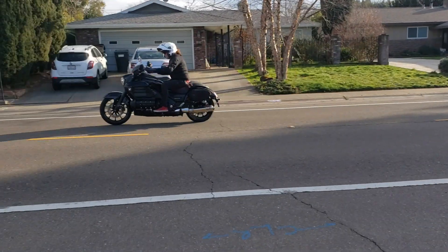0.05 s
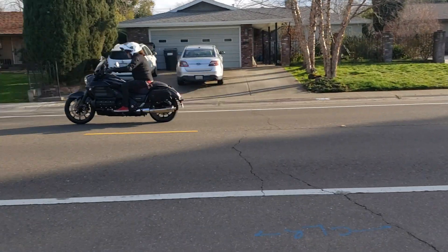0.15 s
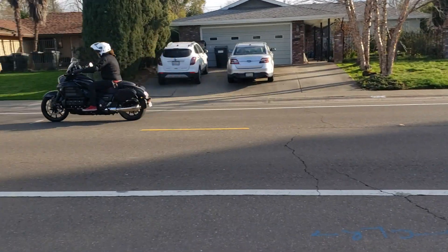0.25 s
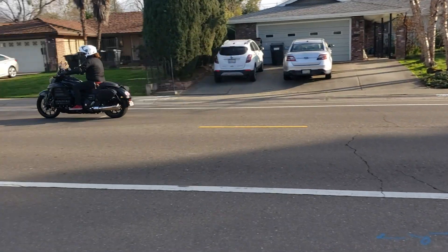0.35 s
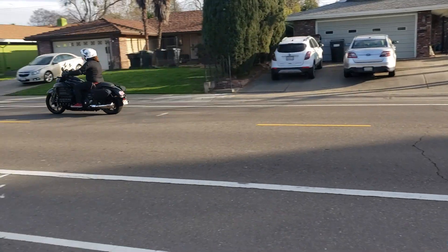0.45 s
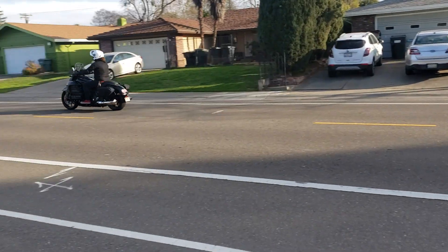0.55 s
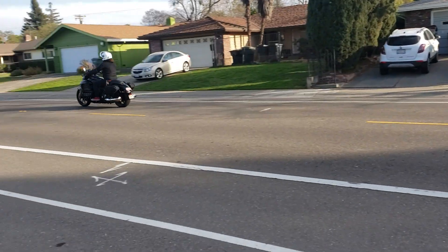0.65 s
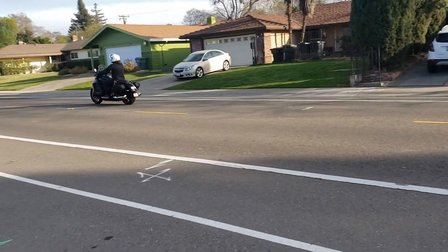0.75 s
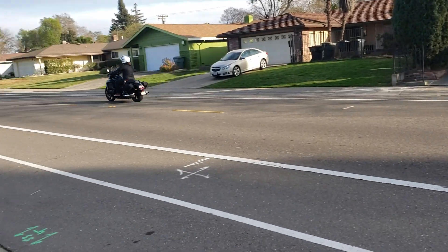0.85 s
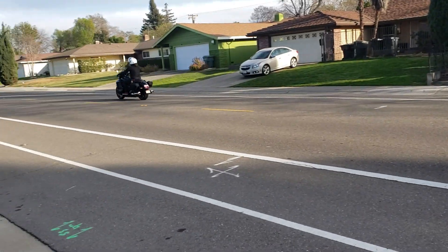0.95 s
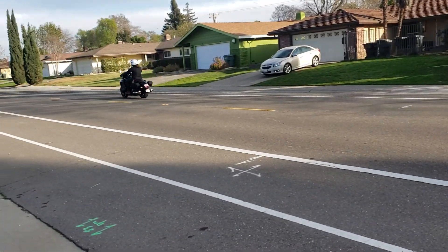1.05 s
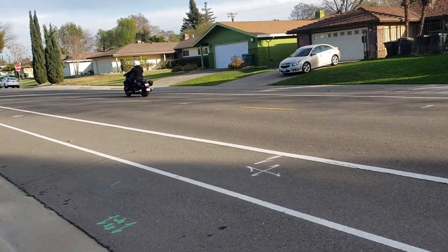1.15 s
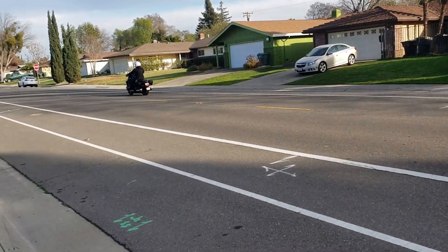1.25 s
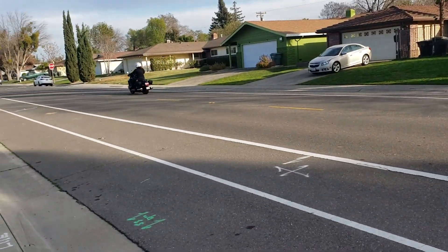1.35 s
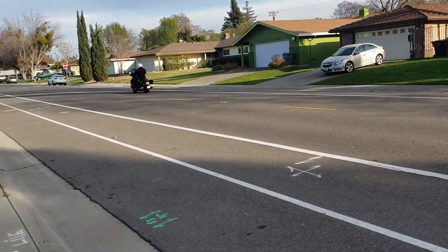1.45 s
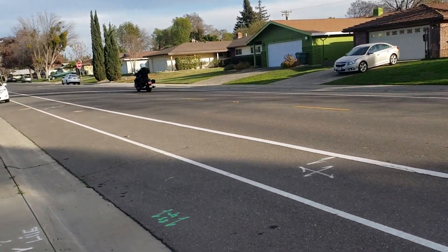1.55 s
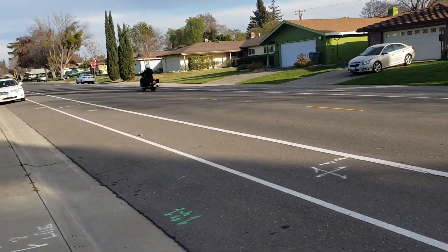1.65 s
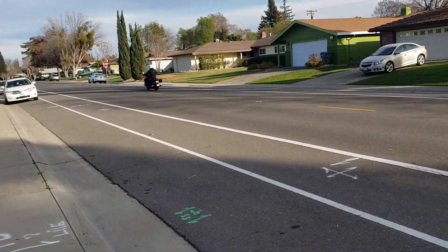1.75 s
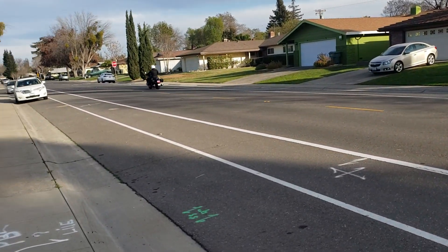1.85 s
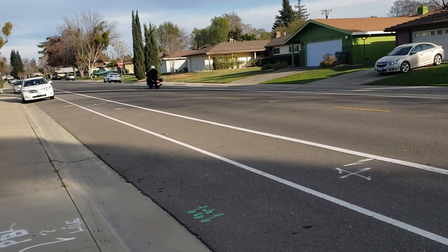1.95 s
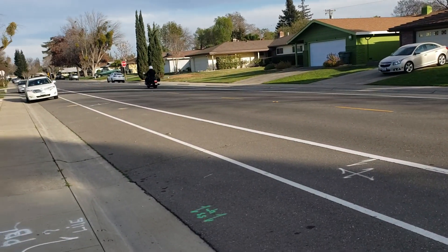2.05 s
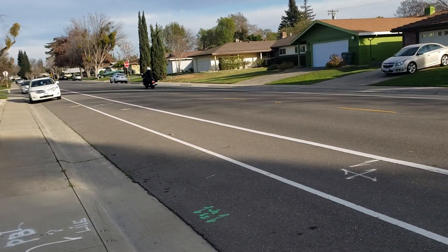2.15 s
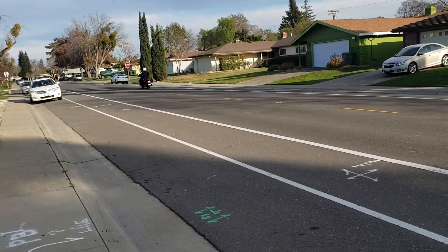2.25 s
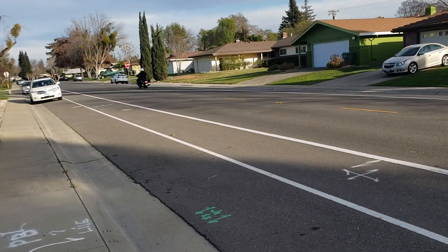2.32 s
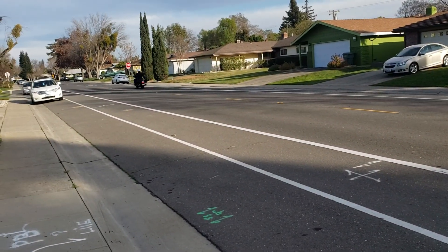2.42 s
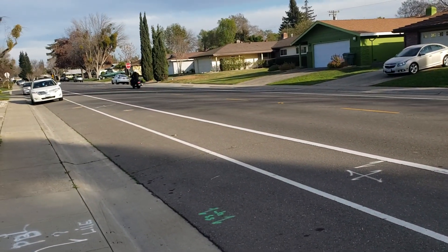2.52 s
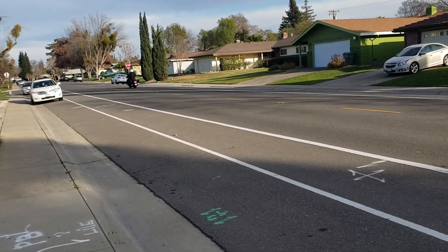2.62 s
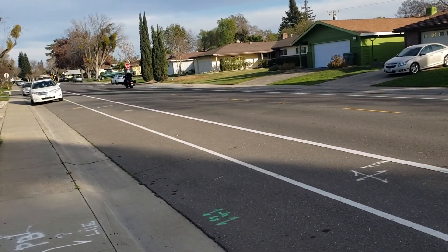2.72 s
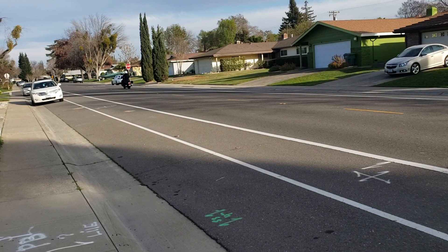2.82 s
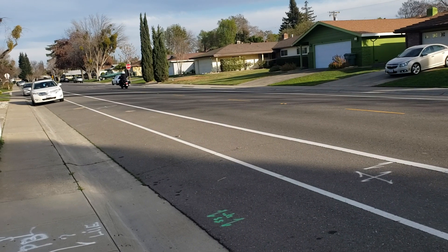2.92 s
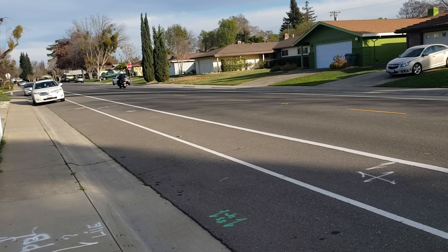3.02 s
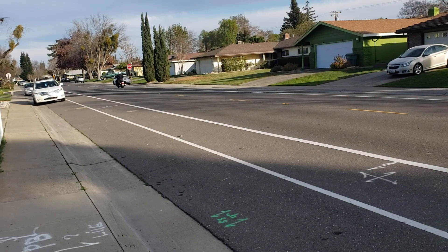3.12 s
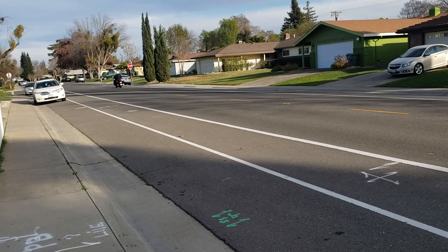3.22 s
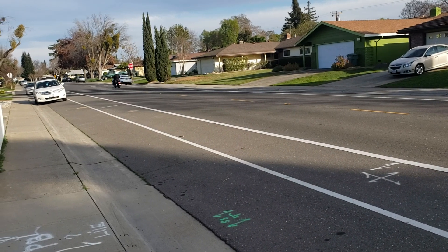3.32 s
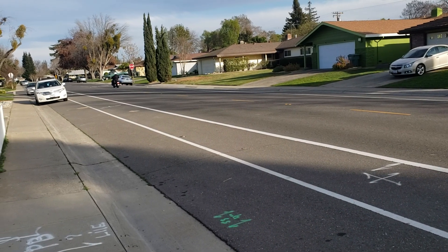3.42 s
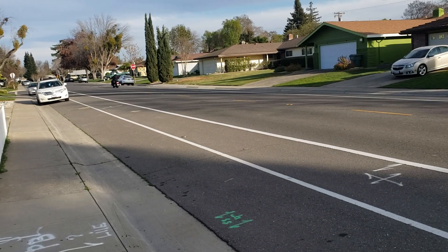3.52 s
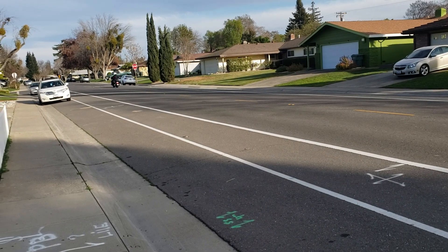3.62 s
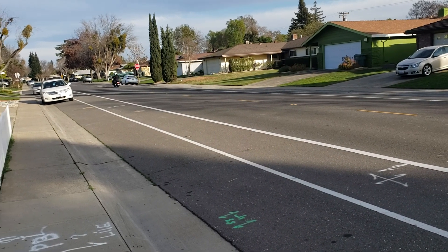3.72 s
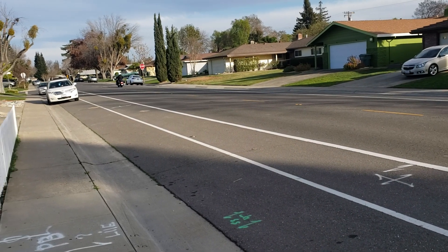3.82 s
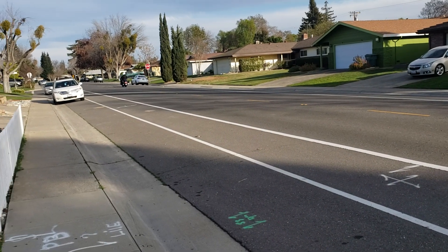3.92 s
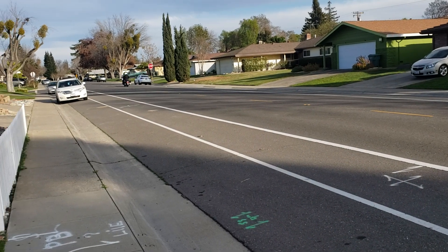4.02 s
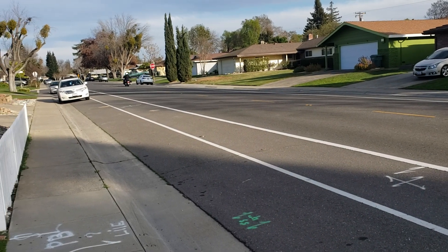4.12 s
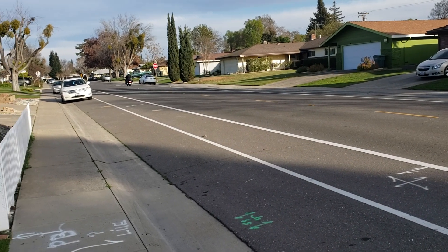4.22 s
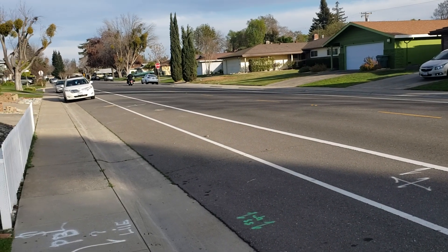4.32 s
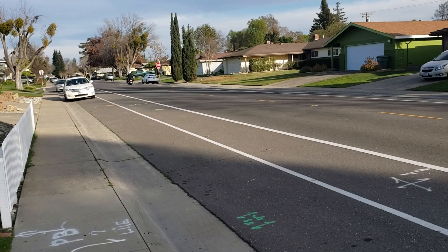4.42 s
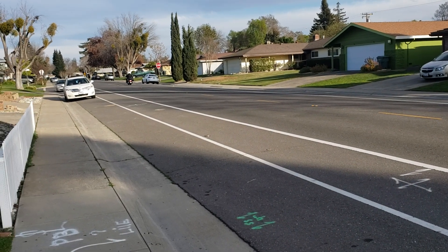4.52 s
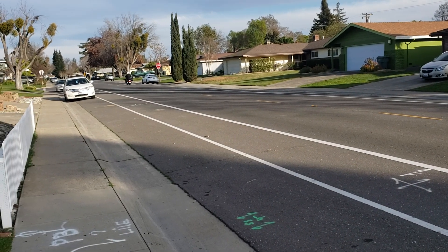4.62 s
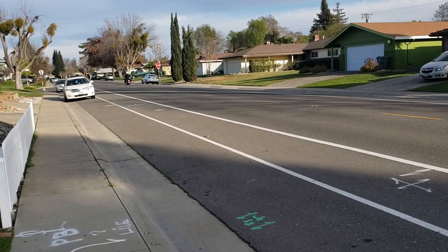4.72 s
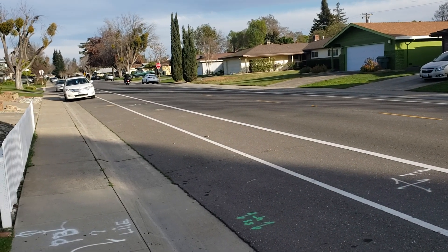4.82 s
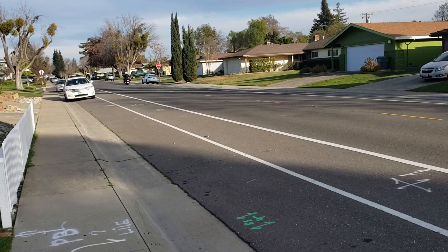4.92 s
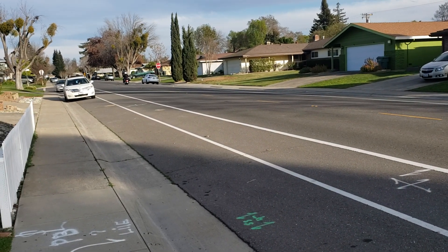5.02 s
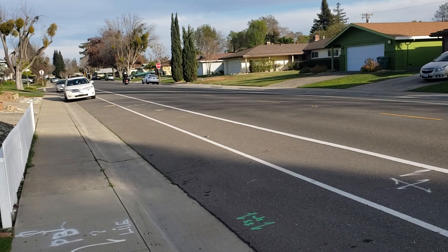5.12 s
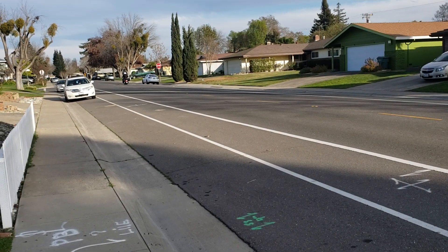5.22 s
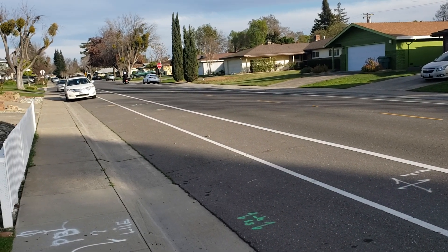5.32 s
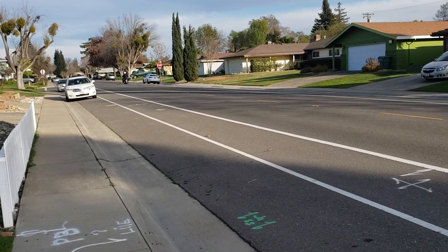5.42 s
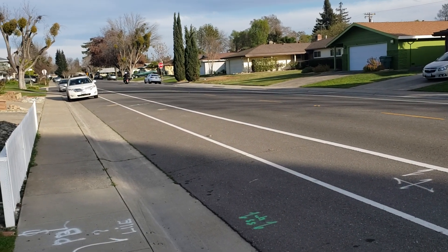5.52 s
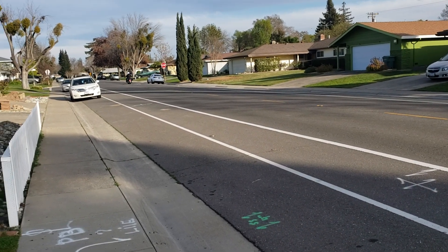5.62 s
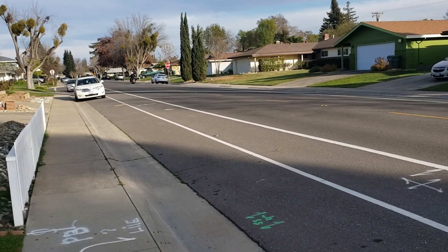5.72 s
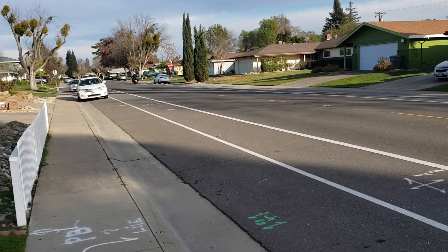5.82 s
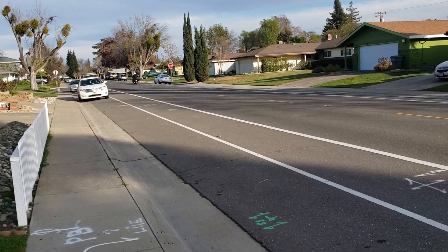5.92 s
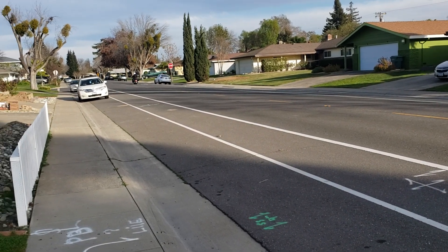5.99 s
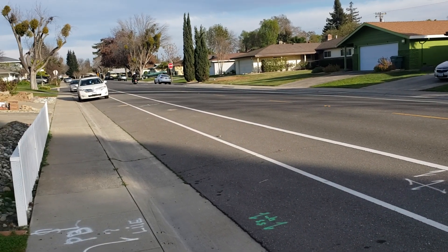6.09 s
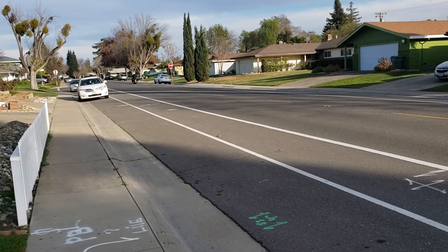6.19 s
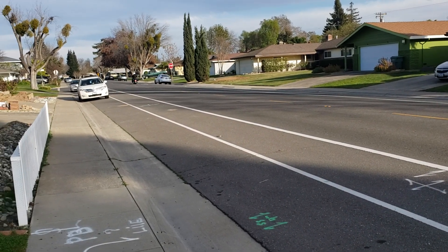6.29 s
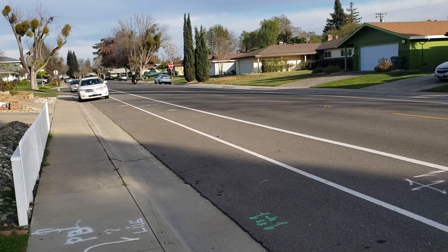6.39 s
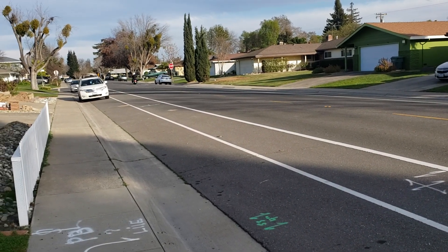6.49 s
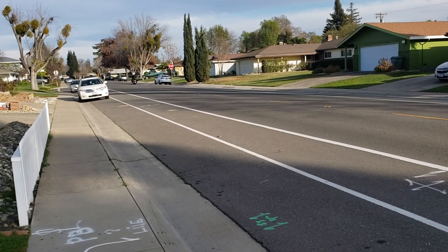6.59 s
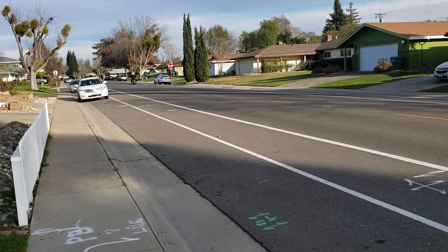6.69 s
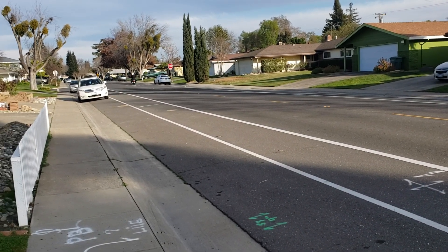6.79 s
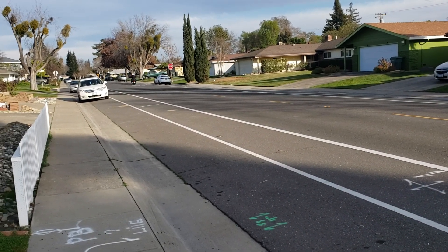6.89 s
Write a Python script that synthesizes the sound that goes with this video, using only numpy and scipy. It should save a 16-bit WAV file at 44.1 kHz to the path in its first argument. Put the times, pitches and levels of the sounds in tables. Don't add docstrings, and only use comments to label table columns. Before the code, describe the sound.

A roadside stereo microphone on an open suburban street. At 0 s a large motorcycle is right there: a deep, full exhaust drone with rough engine roar and tyre hiss, and a short metallic chirp at about 0.1 s. Pitch peaks near 0.2 s, then slides steadily down as the machine rides away; hiss and thin gear whine fade over the first few seconds, and the tone flutters with brief dips. Dry grit ticks close by at 1.7 s, 2.1 s with a dull knock, 2.4 s and most strongly around 2.9 s. Faint bird chirps begin at 3.2 s and recur. From 4.1 to 5.5 s the distant engine nears idle with soft, low, irregular pops, weakening. Two small low throttle swells follow near 5.8 and 6.8 s, over distant traffic rumble and a faint steady motor hum.

```python
import sys
import numpy as np
from scipy import signal
from scipy.io import wavfile

SR = 44100
rng = np.random.default_rng(int(sys.argv[2]) if len(sys.argv) > 2 else 0)


def decibels_to_gain(level_db):
    exponent = np.asarray(level_db, float) / 20
    return 10 ** exponent


def file_out(sig):
    cols = np.atleast_2d(sig).T
    lim = np.clip(cols, -1, 1)
    pcm = np.round(lim * 32767).astype(np.int16)
    wavfile.write(sys.argv[1], SR, pcm)


N = 306495

# frequency in Hz, level in dB per Hz.
STREET_SPECTRUM = [(25, -17), (59, 0), (89, 1.5), (123, -4.5), (210, -20), (380, -23.5), (652, -25.5),
                   (1000, -27.5), (1900, -44), (2450, -67.5), (4000, -67), (8300, -78.5), (11500, -57),
                   (15800, -53)]
# time in seconds, level in dB.
STREET_LEVEL = [(0, -41.5), (4.5, -41.5), (5.3, -42.5), (6, -39), (6.95, -38.5)]
# frequency in Hz, likeness, limited to -1 to 1 when used.
STREET_LIKENESS = [(60, 1), (250, .9), (400, 0.56), (600, .5), (1000, -0.49), (2000, -0.55), (4000, -2.1),
                   (15000, 0.2)]
# frequency in Hz, left against right in dB.
PORT_BALANCE = [(60, -1.5), (110, 1), (200, -0.5), (380, -0.5), (1290, 3.5), (2380, 1.5), (5400, 3.5),
                (9800, -7.5), (13500, 3)]

# time in seconds, pitch in Hz, level in dB.
FAR_MOTOR = [(4.15, 259.7, -87), (4.24, 258.1, -60.5), (5.32, 261.7, -60.5), (5.95, 256.6, -49.5),
             (6.56, 257, -52.5), (6.95, 257.6, -53.5)]
# multiple of the pitch, level in dB.
FAR_MOTOR_ORDERS = [(.667, -2.5), (0.752, -18), (1, -0.5)]

# start in seconds, level in dB, extra level of the lead note in dB.
BIRD_PHRASES = [
    (3.245, -72, -20),
    (4.7, -76, -3),
    (5.995, -75, 2),
    (6.63, -77, -20),
]
# delay in seconds, length in seconds, start in Hz, end in Hz, level in dB.
PHRASE_NOTES = [
    (0, .04, 5140, 5080, 1),
    (.022, .07, 4850, 3600, -7),
    (.07, .08, 3750, 3380, 0.0),
]
# start in seconds, length in seconds, start in Hz, end in Hz, level in dB.
SINGLE_NOTES = [
    (3.32, .16, 3900, 3400, -77),
    (3.36, .12, 3400, 3350, -75),
    (3.77, .07, 2800, 2780, -72),
    (5.37, .08, 3400, 3350, -78),
    (6.85, .05, 3300, 3250, -82),
]

# start in seconds, then body, edge and treble peaks in dB, left against right in dB.
GRIT = [(1.6873, -42, -66, -76, 0), (1.6958, -46, -49.5, -65.5, -5.5), (2.0947, -39.5, -54, -65, 6.5),
        (2.1002, -44, -47.5, -54, -1.5), (2.1105, -33.5, -52, -60, 5), (2.1566, -46, -72, -64, -8),
        (2.1658, -44.5, -60, -67, 10), (2.3898, -40, -61, -84, -5.5), (2.798, -56, -70, -84, -2),
        (2.8673, -58, -67, -70.5, 7), (2.8797, -47, -56, -72, -4), (2.8889, -44, -48, -64, 7),
        (2.896, -39, -49, -56, 6.5), (2.9092, -29.5, -39, -55, 6.5), (2.9185, -44, -45, -63, -3),
        (2.9265, -41.5, -46, -52, -5.5), (2.9432, -44, -62, -69.5, 6), (2.9667, -49, -67.5, -81, 4),
        (3.8086, -64, -90, -91, 9)]
# start in seconds, pitch in Hz, 60 dB decay time in seconds, level in dB.
KNOCK = [
    (2.127, 640, .06, -37),
]

# frequency in Hz, level in dB, 60 dB decay time in seconds.
SQUEAK_MODES = [(1470, -14, 0.077), (1617, -0.5, 0.12), (1683, -0.5, 0.07), (1830, -7.5, 0.077),
                (1700, 1, 0.023), (3210, -23.5, 0.15), (3270, -16.5, 0.095)]
# start in seconds, level in dB.
SQUEAK_HITS = [(0.076, -28), (0.078, -26), (0.083, -23), (0.092, -25), (0.1, -37), (0.128, -43),
               (0.144, -45), (.152, -37), (0.166, -48), (0.187, -47), (0.202, -44), (0.221, -45),
               (0.239, -44), (0.252, -57)]

# frequency in Hz, likeness from -1 to 1.
MACHINE_LIKENESS = [(60, 0.98), (250, 0.65), (550, 0.39), (800, 0.39), (1500, 0.81), (2200, 0.037),
                    (4000, 1), (6000, 0.12), (15000, 0.18)]
# frequency in Hz, level in dB per Hz.
HISS_SPECTRUM = [(1290, -27), (2200, 5), (2470, -2), (3080, -2.5), (3660, -2), (4010, -2.5), (4800, -6.5),
                 (6250, -4), (8610, -34.5), (11400, -5), (12300, -20.5), (14000, -16.5), (15100, -18.5),
                 (15700, -27)]
# frequency in Hz, level in dB per Hz.
ROAR_SPECTRUM = [(290, 1.5), (340, -7), (400, -17), (800, -15), (950, -5.5), (1100, -8.5), (1260, -9),
                 (1610, -7), (2050, -13), (2350, -29), (2700, -29)]
# frequency in Hz, width in Hz, level in dB.
SILENCER = [(542, 98, -5.5), (623, 90, -2.5)]
# level at the closest point in dB, power of the speed,
# air loss in dB per metre, level left when far in dB.
ROAR_LAW = (-35.5, 0.86, 0.0253, -72.5)
HISS_LOW_LAW = (-42.5, 4, -0.29, -95.5)
HISS_MIDDLE_LAW = (-43, 1, 0.43, -97)
HISS_TOP_LAW = (-45.5, 0.5, 0.5, -85)

# frequency in Hz, width in Hz, level in dB.
CASING = [(1740, 35, -53), (1985, 60, -53), (2310, 110, -54), (3120, 90, -52), (3920, 110, -44.5),
          (4150, 220, -57)]
# frequency in Hz, width in Hz, level in dB.
CASING_OCTAVE = [(4000, 170, -56), (4800, 750, -60.5), (6100, 700, -65)]

# start in seconds, peak in dB, pitch in Hz.
POPS = [(4.075, -17, 74.3), (4.124, -23, 111), (4.207, -23.5, 84), (4.28, -15, 101), (4.377, -19, 78.2),
        (4.46, -22, 94), (4.553, -20.5, 77.7), (4.608, -28, 91.7), (4.681, -26.5, 110), (4.773, -25.5, 104),
        (4.917, -27.5, 95), (4.963, -22, 73.4), (5.129, -23, 82.4), (5.319, -29.5, 84), (5.416, -36, 79.7),
        (5.493, -43, 57.5)]

# time in seconds, four-stroke cycles per second.
ENGINE_SPEED = [(0, 26.9), (.2, 29.6), (1.05, 26.3), (1.43, 24.6), (2.47, 19.8), (3.61, 14.7), (3.8, 13.8),
                (4.03, 13.1), (4.3, 10.4), (4.45, 11.7), (5, 9.8), (5.52, 10), (5.76, 12.8), (5.9, 13),
                (6.2, 12), (6.45, 10.8), (6.8, 11.85), (6.95, 12.2)]
# time in seconds, firing tone in dB, one bank against it in dB,
# third harmonic of the bank against it in dB, uneven cylinders in dB.
EXHAUST = [(0, -22.5, -2.5, -6.5, -32.5), (.19, -27, 7.5, -7.5, -32), (.75, -24.5, -4.5, -11.5, -42),
           (1.1, -25.5, -1.5, -16.5, -42), (1.7, -26, -11.5, -15.5, -43.5), (2, -29.5, -9, -17.5, -44),
           (2.55, -25.5, -25.5, -21, -49.5), (3.18, -24.5, -33, -21.5, -51), (3.45, -30.5, -18, -18.5, -50),
           (3.85, -35, -27.5, -12, -52.5), (4.1, -41, -24, -2.5, -49.5), (4.37, -35.5, -36, -7.5, -49),
           (4.6, -46.5, -21, 1, -52.5), (5.45, -58.5, -10.5, 1, -55.5), (5.78, -38.5, -30, -1, -55),
           (6.17, -37, -28, -14.5, -59), (6.35, -44.5, -22, 4, -54.5), (6.85, -37, -33, -13, -58)]
# frequency in Hz, level against the firing tone in dB.
OUTLET = [(120, -7), (140, -5.5), (165, -7), (185, -16), (215, -36), (270, -26), (310, -29), (350, -24.5)]
CYLINDER_STRENGTHS = [1.4, .3, -.7, -.6, -.7, .3]
# frequency in Hz, width in Hz, level in dB.
PIPE = [(75, 52, 2), (101.7, 43, 4), (172, 56.5, -2), (251, 56, -7)]
# time in seconds, width in seconds, depth in dB.
TONE_FADES = [(.8, 0.022, -0.5), (1.36, 0.026, -1.5), (2.2, 0.013, -3.5), (3.28, 0.015, -2),
              (4.0, 0.034, 2), (6.29, .04, -5), (1.536, 0.039, -6), (1.79, 0.041, -8.5), (2.0, 0.044, -4),
              (2.344, 0.024, -14), (2.61, 0.029, -5.5), (2.904, 0.014, -20), (3.43, 0.026, -5.5),
              (5.92, 0.024, -9.5)]
# time in seconds, width in seconds, depth in dB.
BANK_FADES = [
    (.86, 0.17, -10),
    (1.33, 0.14, -12.5),
    (1.72, 0.074, -14),
    (2.4, .06, -7),
]

PASS_M, METRES_PER_CYCLE = 8.4, 0.68
TEETH_PER_CYCLE, CLUTCH_S, COAST_HZ_PER_S = 149, 4, 260


def unit(x):
    return x / np.sqrt(np.mean(x ** 2) + 1e-20)


def in_time(rows):
    s, *columns = np.transpose(rows)
    return [np.interp(np.arange(N) / SR, s, c) for c in columns]


def at_hz(points, hz):
    table_hz, value = np.transpose(points)
    return np.interp(np.log(hz), np.log(table_hz), value)


def drift(rate):
    r = np.exp(-80 * np.pi * rate / SR)
    white = rng.standard_normal(N // 40 + 2002)
    slow = signal.lfilter([1], [1, -2 * r, r * r], white)[2000:]
    return np.interp(np.arange(N) / 40, np.arange(len(slow)), unit(slow))


def ring(clicks, hz, t60):
    r, w = decibels_to_gain(-60 / (t60 * SR)), 2 * np.pi * hz / SR
    return signal.lfilter([0, np.sin(w)], [1, -2 * r * np.cos(w), r * r], clicks + 1e-18)


def band(x, low_hz, high_hz):
    return signal.sosfilt(signal.butter(2, [low_hz, high_hz], "band", fs=SR, output="sos"), x)


def low_pass(x, hz):
    return signal.sosfilt(signal.butter(6, hz, fs=SR, output="sos"), x)


def pan(db):
    return decibels_to_gain(np.array([db / 2, -db / 2]))[:, None]


def noise(spectrum, likeness, patchy_db, count):
    edges = np.geomspace(spectrum[0][0], spectrum[-1][0], count + 1)
    out, together, white = 0, drift(11.0), rng.standard_normal((2, 2, N))
    for k, (low_hz, high_hz) in enumerate(zip(edges, edges[1:])):
        mid, side = band(white[k % 2], low_hz, high_hz)
        hz = np.sqrt(low_hz * high_hz)
        alike = np.clip(at_hz(likeness, hz), -.99, .99)
        gain = decibels_to_gain(at_hz(spectrum, hz) + patchy_db * (0.99 * together + drift(16)))
        pair = np.sqrt(1 + alike) * mid + np.sqrt(1 - alike) * side * [[1], [-1]]
        out = out + gain * pair * pan(at_hz(PORT_BALANCE, hz))
    return unit(out)


def street():
    bed = decibels_to_gain(in_time(STREET_LEVEL)[0]) * noise(STREET_SPECTRUM, STREET_LIKENESS, patchy_db=0.5, count=22)
    near_air = band(band(bed, 3300, 21000), 3300, 21000)
    return low_pass(bed, 1850) + decibels_to_gain(-3.5) * near_air


def hum():
    hz, db = in_time(FAR_MOTOR)
    angle = 2 * np.pi * np.cumsum(hz) / SR
    return sum(decibels_to_gain(db + 0.5 + order_db + 1.5 * drift(20)) * np.sin(order * angle)
               for order, order_db in FAR_MOTOR_ORDERS)


def bird():
    sung = list(SINGLE_NOTES)
    for s, db, lead_db in BIRD_PHRASES:
        for delay, length, start_hz, end_hz, note_db in PHRASE_NOTES:
            sung.append((s + delay, length, start_hz, end_hz, db + note_db + lead_db * (delay == 0)))
    out = np.zeros(N)
    for s, length, start_hz, end_hz, db in sung:
        n = round(length * SR)
        angle = 2 * np.pi * np.cumsum(np.linspace(start_hz, end_hz, n)) / SR
        out[round(s * SR):][:n] += decibels_to_gain(db) * np.hanning(n) * np.sin(angle)
    out *= .45 + .6 * drift(200)
    t = np.arange(SR // 4) / SR
    returns = rng.standard_normal((2, len(t))) * np.exp(-t / .05) * decibels_to_gain(-28)
    return (out + signal.fftconvolve(out[None], returns)[:, :N]) * pan(3.0)


def grit():
    out, t = np.zeros((2, N)), np.arange(1500) / SR
    envelope = np.exp(-t / 0.0005) + 0.16 * np.exp(-t / 0.01)
    for s, body_db, edge_db, treble_db, left_db in GRIT:
        white = rng.standard_normal((2, len(t)))
        burst = (white[0] + 3.9 * white) * envelope
        body = band(band(burst, 1100, 3800), 1100, 3800)
        edge = band(band(burst, 3500, 7000), 3200, 7100)
        treble = band(band(burst, 7300, 15300), 8200, 15600)
        levels = (body, body_db + 1.0), (edge, edge_db + 6.0), (treble, treble_db + 12.0)
        sound = sum(decibels_to_gain(db) * part / np.abs(part).max() for part, db in levels)
        out[:, round(s * SR):][:, :len(t)] += sound * pan(left_db)
    return out


def knock():
    s, hz, t60, db = KNOCK[0]
    blow = decibels_to_gain(db) * (np.arange(N) == round(s * SR))
    return band(ring(blow, hz, t60), 450, 850)


def motion():
    cycles, = in_time(ENGINE_SPEED)
    t = np.arange(N) / SR
    coasting = cycles[CLUTCH_S * SR] - COAST_HZ_PER_S / TEETH_PER_CYCLE * (t - CLUTCH_S)
    road = np.where(t < CLUTCH_S, cycles, coasting)
    return cycles, road, np.hypot(PASS_M, METRES_PER_CYCLE * np.cumsum(road) / SR)


def receding(speed, near_db, power, air_db, far_db):
    metres = motion()[2]
    top_cycles = 29.5
    db = near_db + 20 * np.log10((speed / top_cycles) ** power * PASS_M / metres) - air_db * (metres - PASS_M)
    return np.hypot(decibels_to_gain(db), decibels_to_gain(far_db))


def squeak():
    s, hit_db = np.transpose(SQUEAK_HITS)
    at, out = [round(x * SR) for x in s], np.zeros(N)
    for hz, db, t60 in SQUEAK_MODES:
        clicks = np.zeros(N)
        clicks[at] = decibels_to_gain(hit_db + db) * rng.normal(1, 0.88, len(at))
        out += ring(clicks, hz, t60)
    return (band(out, 1630, 1940) + band(out, 2910, 3990)) * pan(5.0)


def whine():
    _, road, metres = motion()
    hz = TEETH_PER_CYCLE * road

    def swell(line_hz, resonances):
        peaks = sum(decibels_to_gain(db - 10 * ((line_hz - top_hz) / width) ** 2) for top_hz, width, db in resonances)
        return PASS_M / metres * peaks

    angle = 2 * np.pi * np.cumsum(hz * (1 + .002 * drift(40))) / SR
    first = swell(hz, CASING) * (.9 + .4 * drift(60)) * np.sin(angle)
    second = swell(2 * hz, CASING_OCTAVE) * np.array([drift(170), drift(170)]) * np.sin(2 * angle)
    return first * pan(9.0) + second * pan(3.2)


def tyre_hiss():
    road = motion()[1]
    hiss = noise(HISS_SPECTRUM, MACHINE_LIKENESS, patchy_db=1.0, count=13)
    low = receding(road, *HISS_LOW_LAW) * band(hiss, 900, 3500)
    middle = receding(road, *HISS_MIDDLE_LAW) * band(hiss, 4000, 6700)
    top = receding(road, *HISS_TOP_LAW) * decibels_to_gain(5.5) * band(hiss, 8600, 18000)
    return low - middle + top


def roar():
    white = rng.standard_normal(N)
    hollow = 0
    for hz, width, db in SILENCER:
        t60 = 1.5 / width
        hollow = hollow + decibels_to_gain(db) * unit(ring(ring(white, hz, t60), hz, t60))
    broad = noise(ROAR_SPECTRUM, MACHINE_LIKENESS, patchy_db=1.0, count=12)
    return receding(motion()[0], *ROAR_LAW) * unit(low_pass(broad, 2160) + hollow)


def firing_gate():
    turn = np.cumsum(motion()[0]) / SR
    return 1 + .35 * np.cos(12 * np.pi * turn) + .25 * np.cos(6 * np.pi * turn)


def pops():
    out, t = np.zeros(N + SR), np.arange(SR // 5) / SR
    for s, db, hz in POPS:
        thud = np.sin(2 * np.pi * hz * t) * (t / 0.014) * np.exp(1 - t / 0.01)
        out[round(s * SR):][:len(t)] += decibels_to_gain(db - 5.5) * thud
    return out[:N]


def dips(fades):
    t = np.arange(N) / SR
    return sum(db * np.exp(-((t - s) / width) ** 2) for s, width, db in fades)


def pipe(pulses):
    out = 0
    for k, (hz, width, db) in enumerate(PIPE):
        out = out + (-1) ** k * decibels_to_gain(db) * ring(pulses, hz, 2.5 / width)
    return band(out, 41, 290)


def exhaust():
    firing_db, bank_db, third_db, uneven_db = in_time(EXHAUST)
    cycles = motion()[0]
    turn = np.cumsum(cycles) / SR
    pulling_db = -5.5 * (np.arange(N) > 5.5 * SR)
    octave_db = at_hz(OUTLET, 12 * cycles) + pulling_db
    flicker_db = 2.5
    orders = [(3, bank_db + dips(BANK_FADES)), (6, 0),
              (9, third_db + flicker_db * drift(4)), (12, octave_db + flicker_db * drift(4))]
    lines = 0
    for order, db in orders:
        lag = 120 / (order * cycles)
        wave = np.cos(2 * np.pi * order * (turn - .02) - lag)
        lines = lines - np.sqrt(2) * decibels_to_gain(firing_db + db) * wave
    firing = (6 * turn).astype(int)
    fires = np.diff(firing, prepend=0) > 0
    uneven = unit(pipe(fires * np.array(CYLINDER_STRENGTHS)[firing % 6]))
    misfire = unit(pipe(fires * rng.standard_normal(firing[-1] + 1)[firing]))
    return lines + decibels_to_gain(uneven_db + 3.5) * uneven + decibels_to_gain(uneven_db - 3) * misfire


def scene():
    tone = exhaust() * decibels_to_gain(dips(TONE_FADES)) + pops()
    gated_noise = np.sqrt(firing_gate()) * (roar() + tyre_hiss())
    machine = tone + gated_noise + whine() + squeak()
    machine[1, 4:] = machine[1, :-4].copy()
    return machine + street() + hum() + grit() + knock() + bird()


def top_cut(x):
    return signal.sosfilt(signal.butter(12, 15760, fs=SR, output="sos"), x)


def record(dry):
    left = signal.lfilter(*signal.butter(1, 35, "high", fs=SR), decibels_to_gain(-.5) * dry[0])
    mix = signal.sosfilt(signal.butter(4, 38, "high", fs=SR, output="sos"), [left, dry[1]])
    return top_cut(mix)


dry = scene()
out = record(dry)
file_out(out)
```